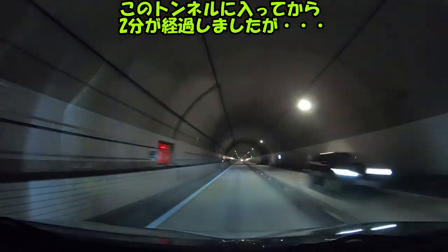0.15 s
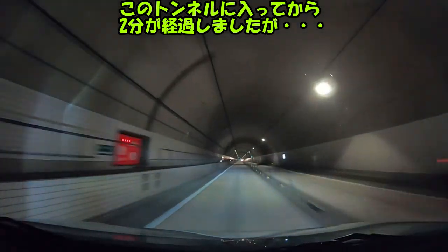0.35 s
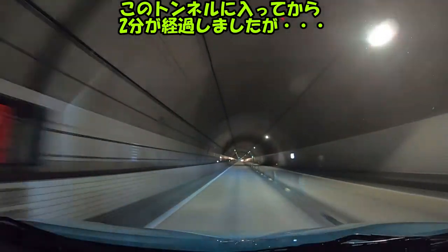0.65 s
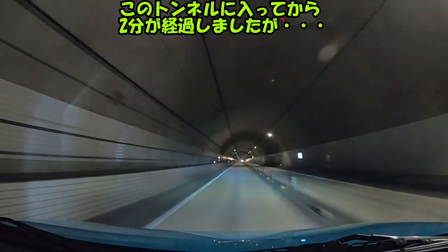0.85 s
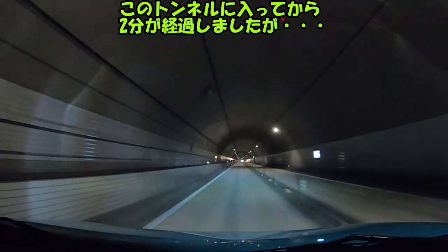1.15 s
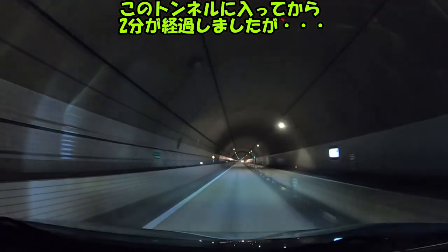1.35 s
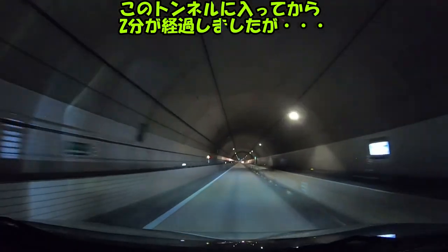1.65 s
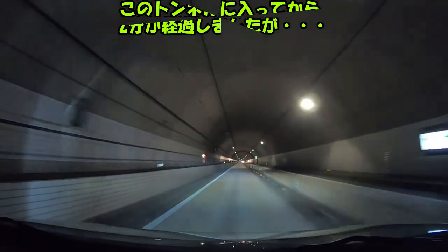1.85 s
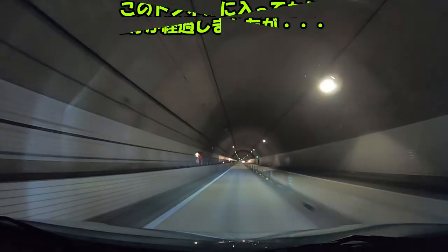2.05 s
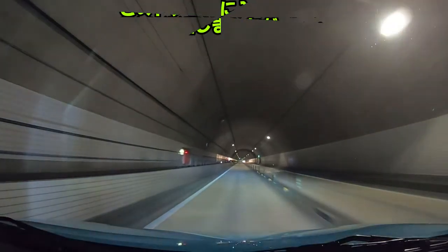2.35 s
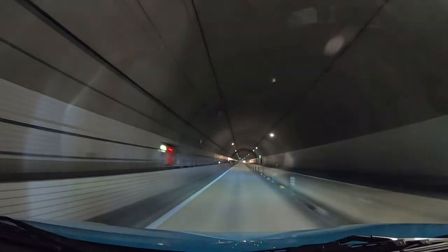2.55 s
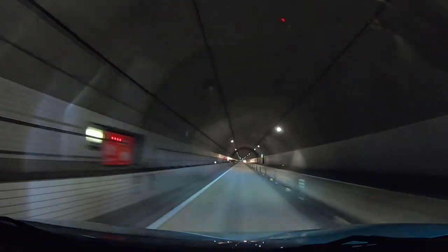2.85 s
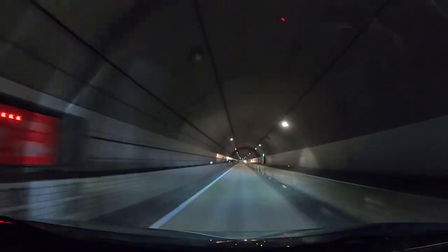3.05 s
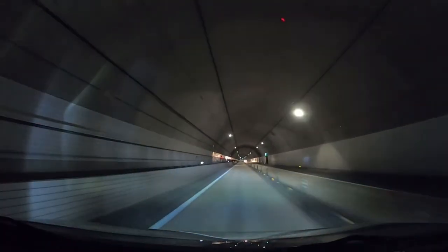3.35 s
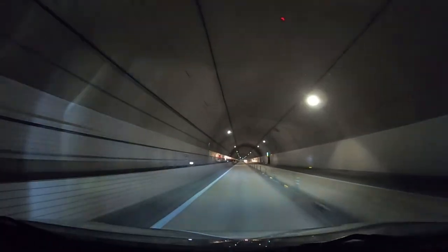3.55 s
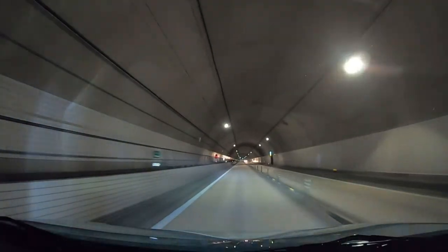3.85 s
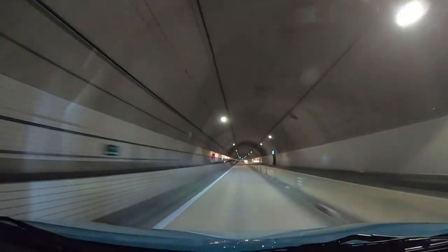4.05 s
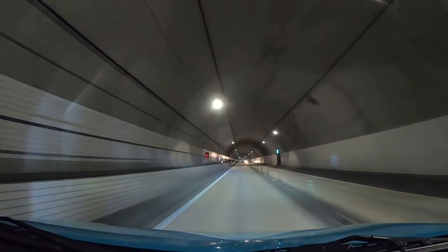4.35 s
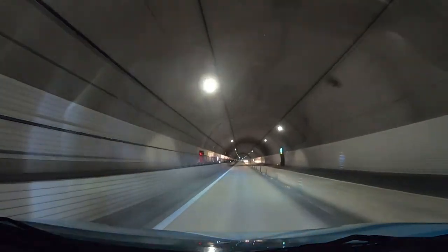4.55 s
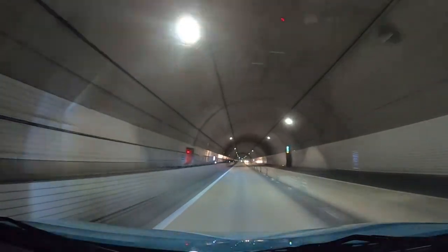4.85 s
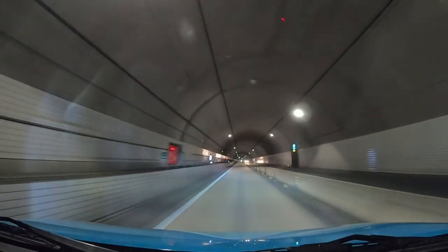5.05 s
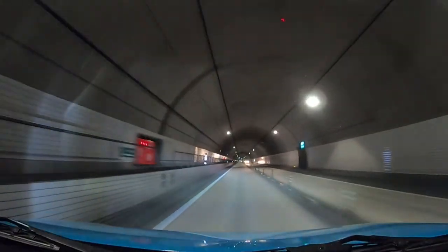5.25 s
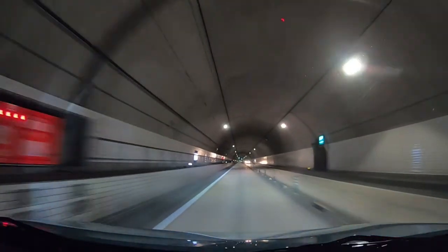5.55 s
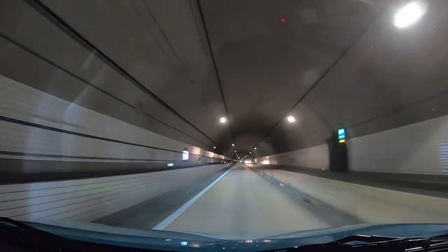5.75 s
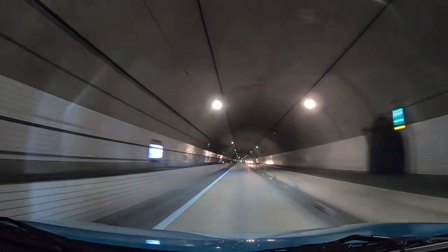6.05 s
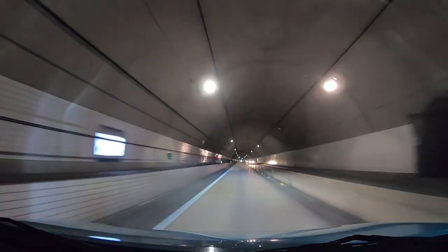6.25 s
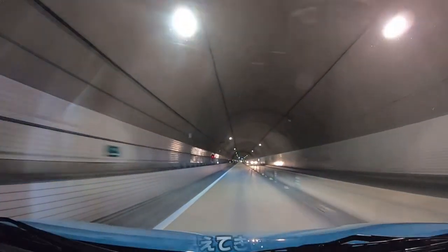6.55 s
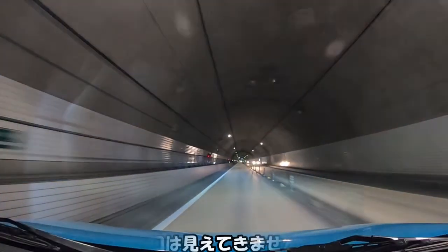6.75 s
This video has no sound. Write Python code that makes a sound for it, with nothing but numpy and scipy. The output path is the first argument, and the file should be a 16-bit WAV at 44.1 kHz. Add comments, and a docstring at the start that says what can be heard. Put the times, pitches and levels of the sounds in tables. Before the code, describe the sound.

Steady low road rumble and engine drone inside a car cruising through a tunnel, with an oncoming car hissing past at the start.

```python
"""Road rumble in a car cruising through a tunnel, heard on a pair of microphones inside the cabin.
The road shakes the body; the engine drones, the cabin air booms and the air in the tyres hums.
From outside, the tunnel's roar comes through the glass and brightens as an oncoming car goes by right
at the start, with faint whistles in its wake. Faint, bright clicks come close to the microphones."""
import sys
import numpy as np
from scipy import signal
from scipy.fft import rfft, irfft
from scipy.io import wavfile
from scipy.ndimage import uniform_filter1d

SR = 44100
rng = np.random.default_rng(int(sys.argv[2]) if len(sys.argv) > 2 else 0)


def persist_wave(psi):
    """Save psi, clipped to +-1, as 16-bit WAV."""
    counts = np.round(np.clip(psi, -1, 1) * 32767).astype(np.int16)
    wavfile.write(sys.argv[1], SR, np.atleast_2d(counts).T)


N = 304290
TIME, FREQ = np.arange(N) / SR, np.fft.rfftfreq(N, 1 / SR)

# Road vibration in the cabin. Each row: frequency in Hz, level in dB per Hz before resonances.
RUMBLE_SPECTRUM = [(10, -66.5), (18, -50.5), (25, -42), (42, -44.5), (70, -45), (100, -43), (125, -45),
                   (165, -51), (205, -55.3), (265, -55.2), (315, -59.5), (400, -67), (520, -74.5),
                   (1500, -150)]
# Body panels and cabin air ringing with it. Each row: frequency in Hz, width in Hz, boost in dB.
BODY_MODES = [(24.3, 3, 2.5), (51.1, 4.8, 7), (91.1, 5.8, 6.5), (140.3, 1.7, 5), (184.4, 8.2, 5.5),
              (248, 9.1, 3.5), (282.5, 15, 5.5), (329, 6.1, 3), (354.6, 8.2, 5), (400.6, 10, 8),
              (427, 22, 8), (471, 8, 6)]
# Coarser or smoother stretches of road. Each row: middle in seconds, length in seconds,
# then lifts in dB of the deep rumble, the upper rumble and the roar.
ROAD_STRETCHES = [(0.089, .22, 0, 3, 0.2), (0.549, 0.41, 1.1, 0.5, 0), (1.402, 1, -1.1, 0.5, 0.5),
                  (2.55, .4, 0.5, 1.5, 0.7), (3.38, .25, -1.5, 0, 0.7), (3.72, 0.18, 0.5, 1, -0.3),
                  (4.097, .4, -0.5, 0, -0.5), (6.052, .4, -1.5, 2, 1.2), (6.397, .35, 4, -0.8, 1.5)]
# Swells and dips of the three drones. Each row: middle in seconds, length in seconds, lift in dB.
ENGINE_LIFTS = [(1.576, 0.16, 9), (1.975, 0.15, 7.5), (2.652, 0.4, 6), (3.657, 1, 4.5), (5.244, .45, 4.5),
                (6.302, 0.77, 2.5)]
CABIN_LIFTS = [(4.103, 1.9, 3.5)]
TYRE_LIFTS = [(.32, 0.28, 7), (0.597, 0.19, 9.5), (0.936, 0.38, 9.5), (1.468, .15, 6.5), (1.648, 0.11, -8),
              (2.04, 0.14, 6.5), (2.25, 0.18, -7), (2.633, 0.17, 9), (2.851, 0.13, 8), (3.33, 0.18, 9.5),
              (3.668, 0.29, 10.3), (4.12, 0.16, 3.5), (4.242, .08, -10), (4.349, .1, 6.5), (4.942, 0.17, 5),
              (5.2, 0.086, 7.5), (5.468, 0.17, 5), (5.737, 0.21, 11), (6.176, 0.14, 9), (6.43, .14, -9)]
# Tyre and wind roar through the glass. Each row: frequency in Hz, level in dB per Hz before resonances.
ROAR_SPECTRUM = [(150, -87.5), (450, -69), (620, -69), (850, -70), (1050, -71.5), (1400, -74.5),
                 (1780, -78.5), (2100, -83), (3300, -89), (4500, -95), (5600, -104), (7100, -109),
                 (9700, -119), (11500, -145)]
# Glass and cabin resonances in the roar. Each row: frequency in Hz, width in Hz, boost in dB.
GLASS_MODES = [(612, 35, 4.5), (823, 48, 2.3), (896, 25, 2.3), (1310, 110, 2), (1700, 70, 3.3),
               (1800, 60, 2), (1960, 6.4, 4.5), (3420, 200, 1), (3750, 300, 1), (4630, 120, 2.2),
               (6950, 300, 1.5)]
# Outside sound at the two microphones. Each row: frequency in Hz, left-right correlation.
MIC_LIKENESS = [(400, .6), (640, .6), (850, .25), (1060, -0.13), (1350, 0.21), (1700, .72), (2100, 0.16),
                (2500, .5), (4500, 0.45), (5300, 0.5), (7500, 0.78)]
# Hiss of the oncoming car. Each row: frequency in Hz, relative level in dB.
ONCOMING_SPECTRUM = [(300, -81), (700, -71), (1500, -80), (2900, -80.7), (4500, -91.3), (6000, -102),
                     (9300, -117), (11500, -148)]
# Faint clicks close to the microphones. Each row: time of the peak in seconds, relative level in dB.
CLOSE_CLICKS = [(0.2904, -61), (0.7274, -59), (1.2851, -61), (1.3804, -56), (1.776, -62), (2.7907, -60),
                (3.4607, -58), (3.5904, -59), (3.6842, -56), (3.7044, -60), (4.7697, -58), (5.0616, -62),
                (5.6372, -54), (5.7754, -62), (6.3586, -56)]
# Tone colour of a click. Each row: frequency in Hz, relative level in dB.
CLICK_SPECTRUM = [(2000, -20), (5500, -1), (9700, 1), (10600, -11), (14000, -30)]
# Whistles behind the oncoming car. Each row: middle in seconds, length in seconds, level in dB,
# pitch in Hz, rise in Hz per second.
WAKE_WHISTLES = [(0.69, .12, -66.5, 4690, -300), (0.94, .15, -50.5, 1720, 329),
                 (1.12, .14, -49, 1778, 328.5)]


def amp(db):
    """Decibels to gain."""
    return 10 ** (np.asarray(db) / 20)


def unit(x):
    """Scales to rms 1."""
    return x / np.sqrt(np.mean(x ** 2) + 1e-30)


def over_freq(points):
    """Reads (Hz, value) rows on a log-frequency axis."""
    hz, value = np.transpose(points)
    return np.interp(np.log(FREQ + 1), np.log(hz + 1), value)


def noise(gain, likeness=0.):
    """Stereo noise with the given amplitude per root Hz and left-right correlation."""
    left, other = rfft(rng.standard_normal((2, N))) * np.sqrt(SR / 2)
    same = np.clip(likeness, -1, 1)
    right = same * left + np.sqrt(1 - same ** 2) * other
    return irfft(np.array([left, right]) * gain, N)


def ringing(modes):
    """Gain of a flat path with resonances standing out of it."""
    power = sum((amp(db) ** 2 - 1) / (1 + (2 * (FREQ - hz) / width) ** 2) for hz, width, db in modes)
    return np.sqrt(1 + power)


def drift(rate_hz):
    """Slow random wander of rms 1."""
    return unit(noise(np.exp(-(FREQ / rate_hz) ** 2))[0])


def steadied(x, span_s):
    """Evens out the slow swells of a sound and keeps its fast flutter."""
    local_power = uniform_filter1d((x ** 2).mean(0), int(span_s * SR))
    return unit(x / np.sqrt(local_power + 1e-30)) * np.std(x)


def pan(x, left_db):
    """Makes a sound left_db louder at the left microphone than at the right."""
    return x * amp([[left_db / 2], [-left_db / 2]])


def hump(middle_s, length_s):
    """A smooth rise and fall of height 1, above half height for length_s."""
    return .5 ** ((2 * (TIME - middle_s) / length_s) ** 2)


def swelling(lifts, base_db):
    """Gain that rests at a base level and swells or dips smoothly from it."""
    return amp(base_db + sum(db * hump(s, length) for s, length, db in lifts))


def drone(hz, wander_hz, wander_rate_hz, flutter, flutter_hz):
    """A low tone of rms 1 whose pitch and strength waver at random."""
    turns = np.cumsum(hz + wander_hz * drift(wander_rate_hz)) / SR
    strength = 1 + flutter * np.tanh(drift(flutter_hz))
    tone = strength * np.sin(2 * np.pi * turns)
    return unit(steadied(tone[None], span_s=.43)[0])


def road_surface():
    """Gains of deep rumble, upper rumble and roar as the surface changes, each centred on 0 dB."""
    db = sum(np.outer(lifts, hump(s, length)) for s, length, *lifts in ROAD_STRETCHES)
    return amp(db - db.mean(1, keepdims=True))


def road_rumble(deep_lift, upper_lift, split_hz=125):
    """The road shakes the body in small jolts; the long waves reach both microphones almost alike."""
    spectrum = amp(over_freq(RUMBLE_SPECTRUM)) * ringing(BODY_MODES)
    deep_share = 1 / (1 + (FREQ / split_hz) ** 8)
    deep = steadied(noise(spectrum * np.sqrt(deep_share), likeness=.9937), span_s=.19)
    upper = steadied(noise(spectrum * np.sqrt(1 - deep_share), likeness=.9718), span_s=.29)
    jolts = amp(.12 * drift(rate_hz=14))
    return pan((deep * deep_lift + upper * upper_lift) * jolts, left_db=-.3)


def engine_shake():
    """The engine shakes the cabin at the crank rate."""
    tone = drone(hz=32.9, wander_hz=1.22, wander_rate_hz=4.04, flutter=.54, flutter_hz=7.7)
    return pan(swelling(ENGINE_LIFTS, base_db=-26.5) * tone, left_db=-1.1)


def cabin_boom():
    """The air around the microphones booms on one low note that grows once, midway."""
    tone = drone(hz=114.04, wander_hz=4.5, wander_rate_hz=11.75, flutter=.8, flutter_hz=10)
    return pan(swelling(CABIN_LIFTS, base_db=-28.5) * tone, left_db=-.3)


def tyre_hum(sag_hz_per_s=.1998, upper_db=-9.5):
    """Air rings inside the tyres; rolling splits the ring into two tones, the lower sinking slightly."""
    lower_hz = 233.5 - sag_hz_per_s * TIME
    lower = drone(hz=lower_hz, wander_hz=1.72, wander_rate_hz=5, flutter=.28, flutter_hz=10)
    upper = drone(hz=253.7, wander_hz=2.2, wander_rate_hz=7.9, flutter=.68, flutter_hz=5.7)
    return pan(swelling(TYRE_LIFTS, base_db=-34.5) * (lower + amp(upper_db) * upper), left_db=-.3)


def through_glass(spectrum):
    """Outside noise as it reaches the microphones, coloured by glass and cabin resonances."""
    return noise(amp(over_freq(spectrum)) * ringing(GLASS_MODES), over_freq(MIC_LIKENESS))


def tunnel_roar(road_lift):
    """The car's own tyre and wind noise, thrown back by the tunnel walls."""
    return pan(through_glass(ROAR_SPECTRUM) * road_lift, left_db=-1.4)


def oncoming_car(alongside_s=.24, gain_db=-2.5, approach_db_per_s=7, recede_db_per_s=7.5):
    """Its hiss builds until it is alongside, then trails off down the tunnel behind."""
    since_s = TIME - alongside_s
    distance_loss_db = np.maximum(-approach_db_per_s * since_s, recede_db_per_s * since_s)
    return pan(through_glass(ONCOMING_SPECTRUM) * amp(gain_db - distance_loss_db), left_db=-1.7)


def close_clicks(rise_s=.001, decay_s=.0016, gain_db=-8, tail_s=.02, tail_db=-10):
    """Faint, bright clicks close to the microphones die in milliseconds and leave a short, weak tail."""
    def pulses(fall_s):
        return sum(amp(db) * np.exp(-np.maximum((s - TIME) / rise_s, (TIME - s) / fall_s))
                   for s, db in CLOSE_CLICKS)
    envelope = pulses(decay_s) + amp(tail_db) * pulses(tail_s)
    bright_noise = unit(noise(amp(over_freq(CLICK_SPECTRUM)), likeness=.95))
    return pan(amp(gain_db) * envelope * bright_noise, left_db=-1.5)


def wake_whistle(middle_s, length_s, level_db, pitch_hz, rise_hz_per_s, width_hz=65):
    """In the oncoming car's wake, a narrow band of noise swells and fades as it glides."""
    hz = pitch_hz + rise_hz_per_s * (TIME - middle_s)
    tone = np.sqrt(2) * np.sin(2 * np.pi * np.cumsum(hz) / SR)
    fuzz = noise(np.exp(-(FREQ / width_hz) ** 2), likeness=.9)
    fuzz = unit(steadied(fuzz, span_s=.045))
    return amp(level_db) * hump(middle_s, length_s) * fuzz * tone


def scene():
    """Everything that reaches the microphones in the cabin."""
    deep_lift, upper_lift, roar_lift = road_surface()
    own_car = road_rumble(deep_lift, upper_lift) + engine_shake() + cabin_boom() + tyre_hum()
    outside = tunnel_roar(roar_lift) + oncoming_car()
    flicker = amp(.41 * drift(rate_hz=25))
    whistles = sum(wake_whistle(*row) for row in WAKE_WHISTLES)
    return own_car + outside * flicker + close_clicks() + whistles


def record(dry, fade_s=.004, cutoff_hz=14900):
    """A very short fade at both ends, then the recorder's band limit."""
    from_edge_s = np.minimum(TIME, TIME[::-1])
    fade = np.sin(np.pi / 2 * np.clip(from_edge_s / fade_s, 0, 1)) ** 2
    lowpass = signal.firwin(511, cutoff_hz, window=("kaiser", 9), fs=SR)
    return signal.oaconvolve(dry * fade, lowpass[None], "same")


dry = scene()
out = record(dry)
persist_wave(out)
```